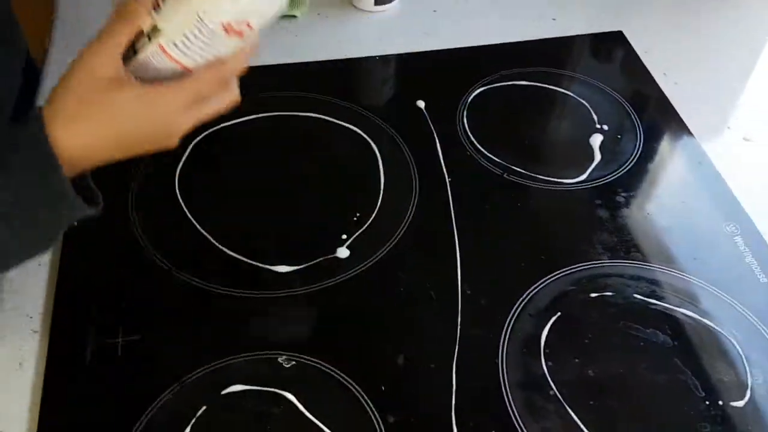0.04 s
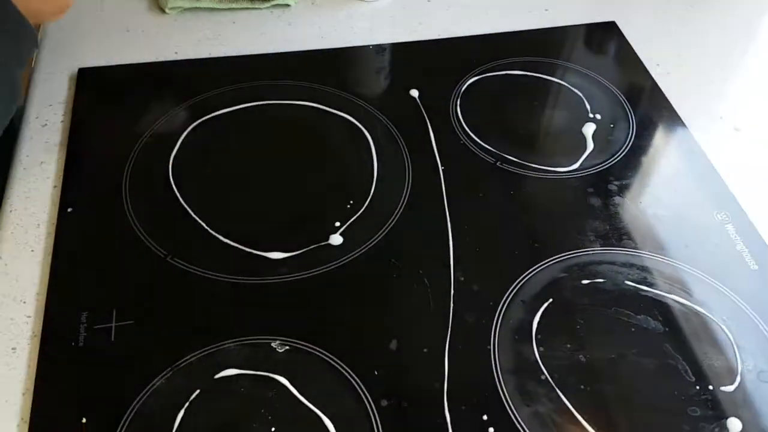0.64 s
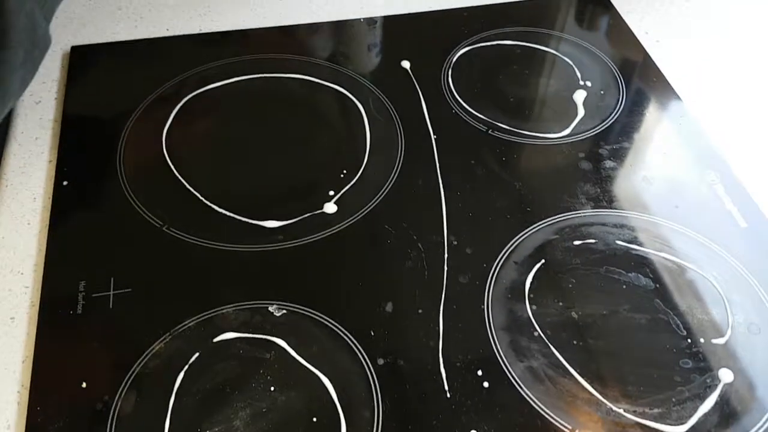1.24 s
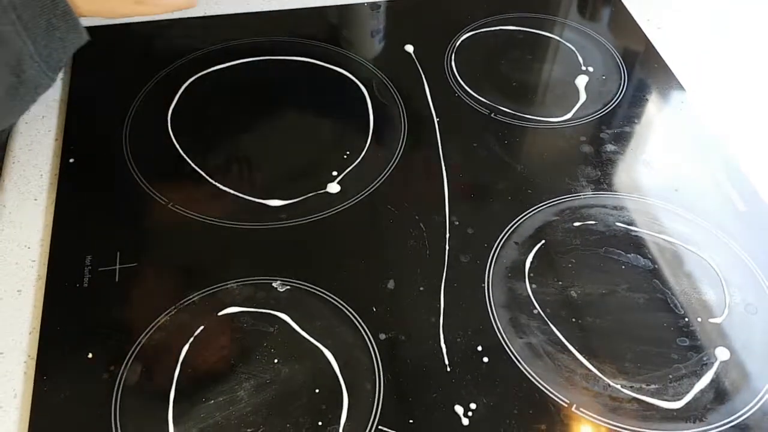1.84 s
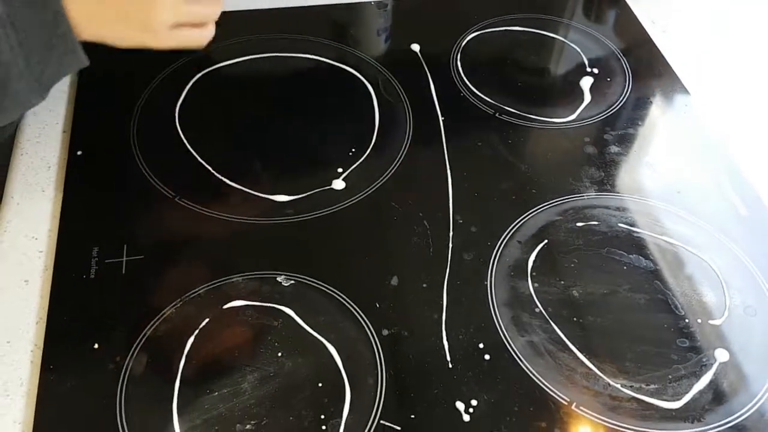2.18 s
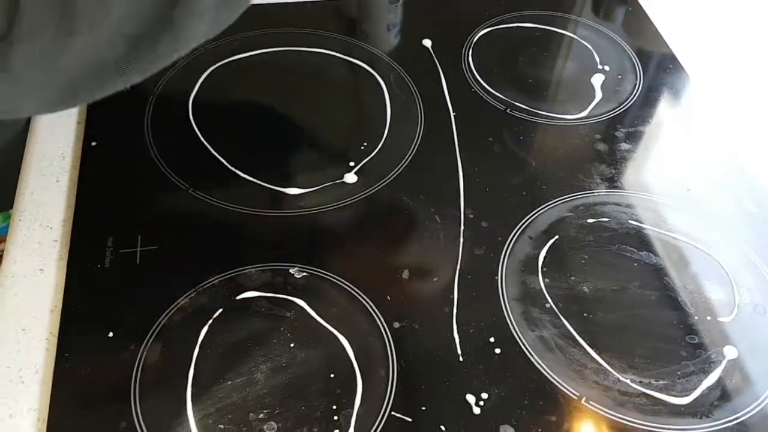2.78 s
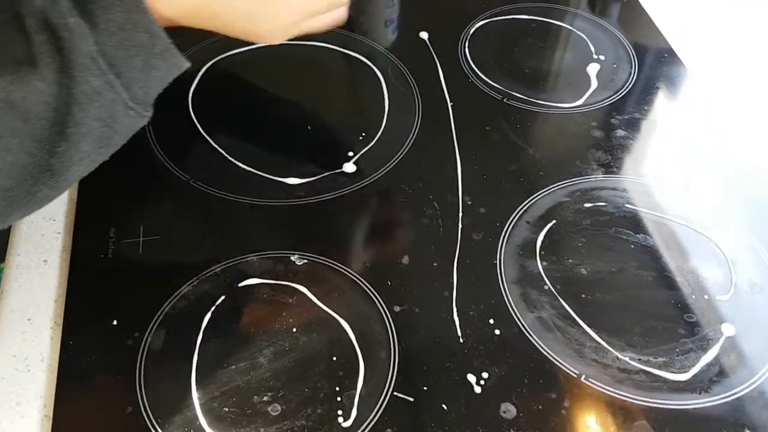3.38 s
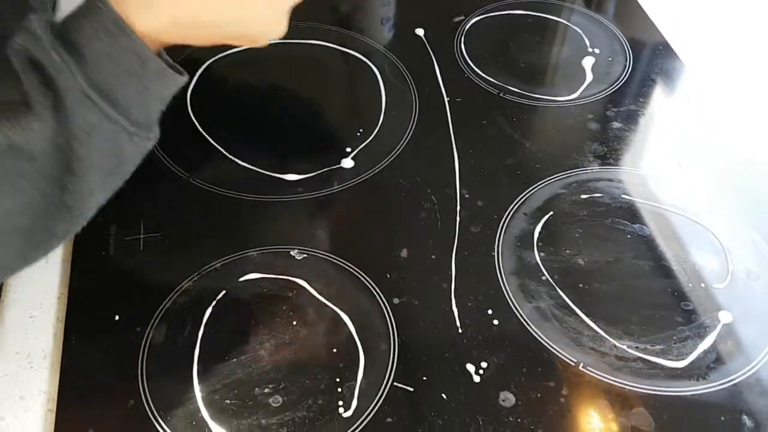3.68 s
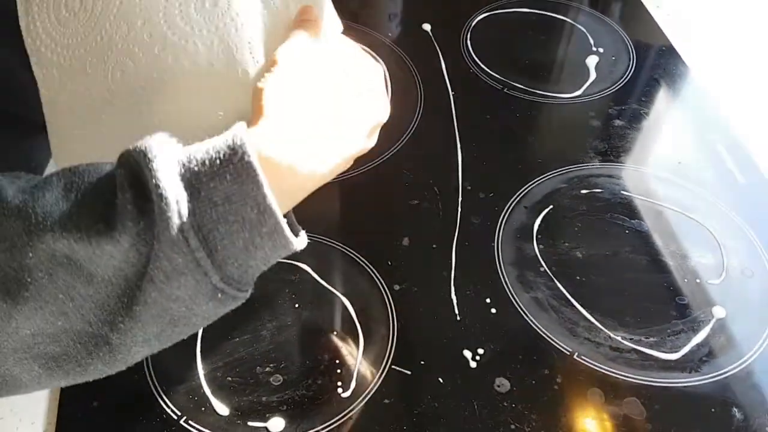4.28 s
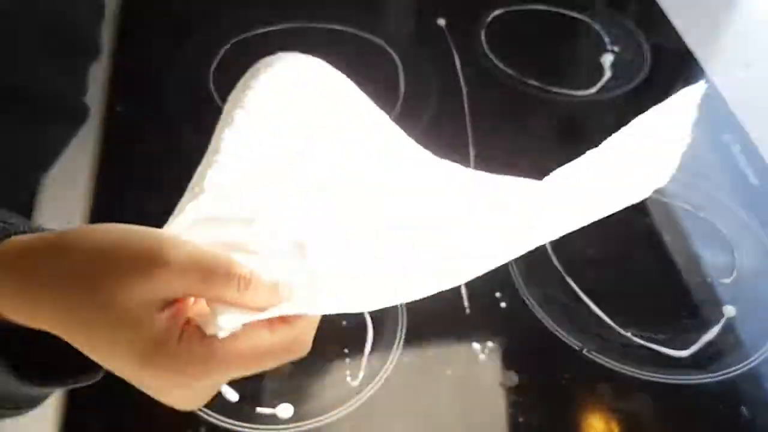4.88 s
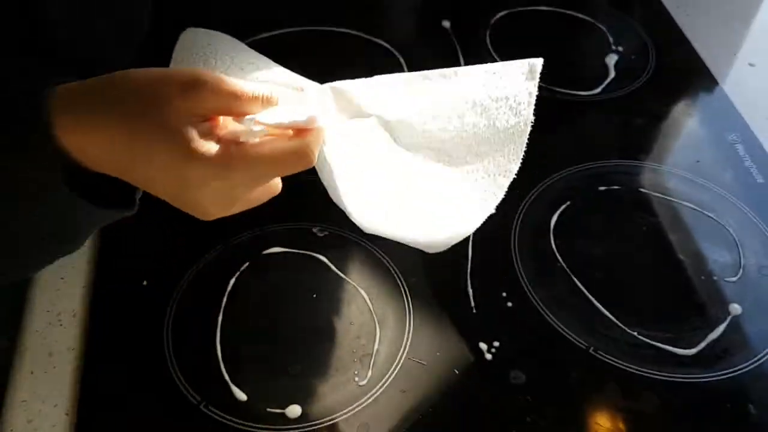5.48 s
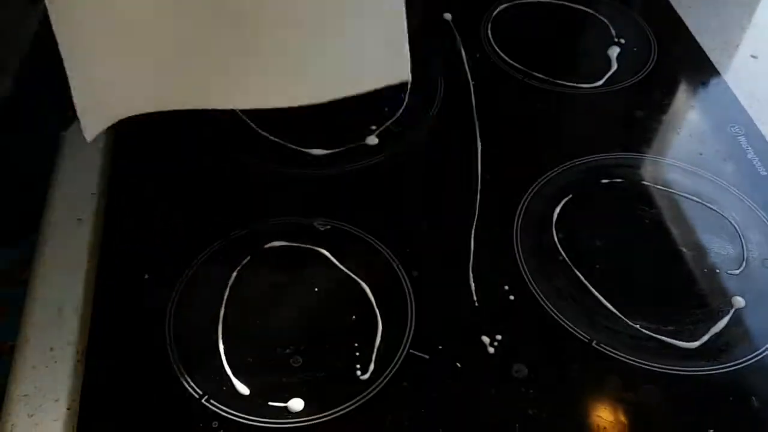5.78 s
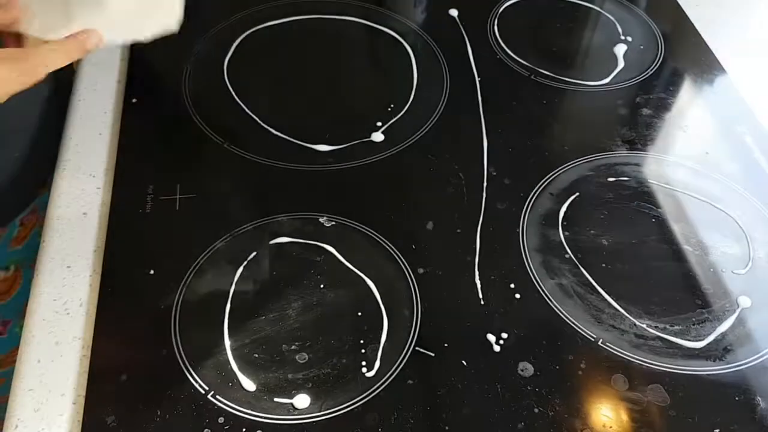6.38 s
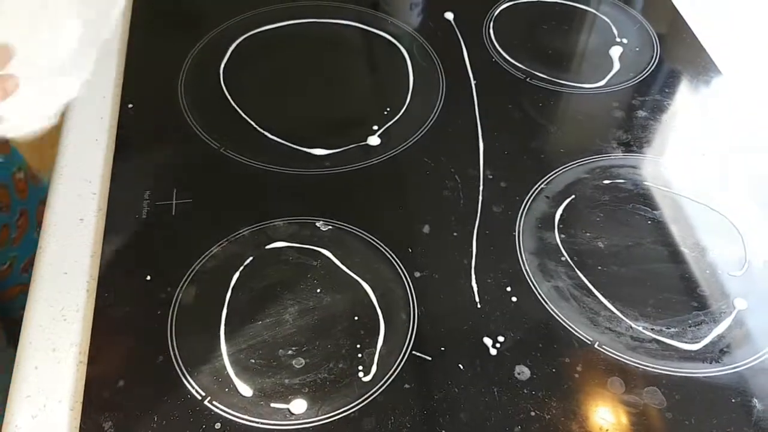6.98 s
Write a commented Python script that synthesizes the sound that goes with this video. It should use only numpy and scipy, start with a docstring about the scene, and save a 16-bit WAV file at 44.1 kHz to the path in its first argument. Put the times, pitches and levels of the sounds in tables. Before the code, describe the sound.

Over a faint appliance hum, a plastic cap clacks shut and a liquid-filled bottle lands on a kitchen counter, settling with a few light knocks and a short room echo. Cloth brushes near the microphone, with a cluster of dry static ticks on the left. One quick rip takes a paper towel off the roll, and quiet paper rustling, creases and soft bumps follow.

```python
"""In a kitchen, a plastic bottle of cleaner is snapped shut and set down beside a glass hob, where it
rocks and settles: the rim rings the shell, the liquid-filled base thuds. A sleeve rustles past the
microphone, static ticks in the left channel, and a paper towel is ripped off its roll in quick jerks
and handled, with soft bumps and flipping creases. An appliance motor hums faintly throughout."""
import sys
import numpy as np
from scipy import signal
from scipy.fft import rfft, irfft
from scipy.io import wavfile

SR = 44100
rng = np.random.default_rng(int(sys.argv[2]) if len(sys.argv) > 2 else 0)


def materialize(psi):
    """Save the field psi as 16-bit PCM at rate SR to the path in sys.argv[1].

    A 1-D psi becomes a single channel; in a 2-D psi each row is a channel.
    """
    bounded = np.clip(np.atleast_2d(psi).T, -1, 1)
    quanta = np.round(bounded * 32767).astype(np.int16)
    wavfile.write(sys.argv[1], SR, quanta)


N = 310464
TIME_S = np.arange(N) / SR


def from_db(db):
    """Decibels to gain."""
    return 10 ** (np.asarray(db) / 20)


def unit_rms(x):
    """Scale to unit power."""
    return x / np.sqrt(np.mean(x ** 2) + 1e-20)


def pan(left_db):
    """Channel gains for a left-right level difference."""
    return from_db(np.array([[left_db], [-left_db]]) / 2)


def at_hz(points, hz, column=1):
    """Read a table column on a log-frequency axis."""
    table = np.array(points)
    return np.interp(np.log(np.maximum(hz, 1)), np.log(table[:, 0]), table[:, column])


def drift(rate_hz):
    """Random wander: straight lines between unit-variance knots."""
    knots = rng.standard_normal(N // 40)
    return np.interp(TIME_S * rate_hz, np.arange(len(knots)), knots)


def decay(t, t60_s):
    """Exponential fall, 60 dB in t60_s."""
    return np.exp(-np.log(1000) * t / t60_s)


def add(out, start_s, sound):
    """Mix a sound in at start_s."""
    start = round(start_s * SR)
    part = sound[..., :N - start]
    out[..., start:start + part.shape[-1]] += part


# left-right likeness: (frequency [Hz], correlation [-1..1])
STEREO_CORRELATION = [(120, 0.85), (300, 0.67), (600, 0.63), (1000, 0.2), (1600, -0.23), (3500, -0.037),
                      (14000, 0.028)]


def noise(spectrum, size=N):
    """Coloured stereo noise of rms 1, alike in the bass, unrelated in the treble."""
    hz = np.fft.rfftfreq(size, 1 / SR)
    correlation = at_hz(STEREO_CORRELATION, hz)
    mid, side = rfft(rng.standard_normal((2, size)))
    stereo = np.sqrt(1 + correlation) * mid + np.sqrt(1 - correlation) * side * [[1], [-1]]
    return unit_rms(irfft(stereo * from_db(at_hz(spectrum, hz)), size))


def burst(spectrum, t60_s):
    """Decaying coloured noise, 0.2 s long."""
    t = TIME_S[:SR // 5]
    return noise(spectrum, size=len(t)) * decay(t, t60_s)


def ring(modes, contact_s, left_lag_s=0, scatter_db=4.5):
    """One blow on (frequency [Hz], level [dB], t60 [s]) modes; longer contact, softer onset."""
    t = TIME_S[:SR // 3]
    stereo_t = t + left_lag_s * np.array([[-0.5], [0.5]])
    out = np.zeros((2, len(t)))
    for hz, db, t60_s in modes:
        gain = from_db(db + scatter_db * rng.standard_normal())
        out += gain * decay(t, t60_s) * np.sin(2 * np.pi * hz * stereo_t)
    return out * (1 - np.exp(-t / contact_s))


# room noise: (frequency [Hz], relative density [dB])
ROOM_SPECTRUM = [(20, -2.5), (45, -2.5), (100, 0.5), (160, -9), (310, -5), (450, -11), (620, -14),
                 (1100, -27), (1700, -14.5), (3300, -25), (9000, -34.5), (14000, -28.5), (16000, -30.5)]


def appliance(hum_hz=400, waver_hz=2.25, air_width_hz=45, hum_db=-69, air_db=-86, room_db=-64.5):
    """A wavering motor tone in a narrow rush of air, over quiet room noise."""
    phase = 2 * np.pi * np.cumsum(hum_hz + waver_hz * drift(4.1)) / SR
    hum = unit_rms(np.sin(phase))
    air = unit_rms(drift(air_width_hz) * np.sin(phase) + drift(air_width_hz) * np.cos(phase))
    return from_db(hum_db) * hum + from_db(air_db) * air + from_db(room_db) * noise(ROOM_SPECTRUM)


# restless sleeve, louder nearer the microphone: (time [s], level [dB])
SLEEVE_LEVELS = [(0, -75.5), (2.1, -72.5), (2.65, -68), (3.1, -61), (3.75, -55), (4.4, -59.5),
                 (4.85, -66.5), (5.55, -74), (6.25, -66.5), (7.04, -69.5)]
# cloth or paper strokes: (start [s], length [s], swish [dB], fibre hiss [dB])
SLIDE_STROKES = [(0.274, 0.12, -82, -69.5), (0.587, 0.11, -82, -67.5), (0.949, 0.095, -66, -61.5),
                 (1.554, 0.054, -68.5, -63), (2.217, 0.12, -54, -56.5), (2.418, 0.1, -65, -68.5),
                 (2.749, 0.08, -52, -52), (2.79, 0.23, -60, -55), (3.107, 0.24, -59, -55.5),
                 (3.232, 0.18, -62.5, -52.5), (3.361, 0.23, -58.5, -58.5), (3.556, 0.33, -70, -56),
                 (3.71, 0.23, -59, -53.5), (4, 0.25, -75, -56.5), (4.23, 0.13, -45.5, -71),
                 (4.69, 0.15, -57.5, -81), (4.923, 0.083, -63.5, -62), (5.174, 0.095, -47.5, -52.5),
                 (5.243, 0.11, -59, -60.5), (5.344, 0.13, -64.5, -64), (5.573, 0.16, -69, -64.5),
                 (5.961, 0.31, -65.5, -59), (6.367, .14, -63, -59), (6.734, 0.3, -64.5, -58.5),
                 (6.929, 0.26, -65, -58.5)]


def sliding_gains(sleeve_hiss_db=-2, rise_share=0.24, fall_share=0.64):
    """Swish and hiss gains: strokes speed up, hold and ease off, adding power to the sleeve's stir."""
    sleeve = from_db(np.interp(TIME_S, *np.transpose(SLEEVE_LEVELS)))
    swish_power = sleeve ** 2
    hiss_power = (sleeve * from_db(sleeve_hiss_db)) ** 2
    for start_s, length_s, swish_db, hiss_db in SLIDE_STROKES:
        progress = (TIME_S - start_s) / length_s
        speed = np.clip(np.minimum(progress / rise_share, (1 - progress) / fall_share), 0, 1)
        swish_power += (from_db(swish_db) * speed) ** 2
        hiss_power += (from_db(hiss_db) * speed) ** 2
    return np.sqrt(swish_power), np.sqrt(hiss_power)


def shifting_folds(x, depth_db=3.5, rate_hz=34):
    """Shifting folds favour one band, then another."""
    hz, spectrum = np.fft.rfftfreq(N, 1 / SR), rfft(x)
    edges_hz = [0, *np.geomspace(500, 2500, 5), SR]
    out = np.zeros((2, N))
    for low, high in zip(edges_hz, edges_hz[1:]):
        band = irfft(spectrum * (hz >= low) * (hz < high), N)
        out += band * from_db(depth_db * drift(rate_hz))
    return out


# sliding cloth or paper, and its fibres: (frequency [Hz], relative density [dB])
SWISH_SPECTRUM = [(30, -14), (80, -1.5), (170, -6), (350, -10), (700, 0.5), (1200, 2.5), (1800, -3.5),
                  (2700, -6.5), (4000, -15), (8000, -26)]
HISS_SPECTRUM = [(1500, 2), (3500, 0), (6500, 0), (8000, -2), (9600, -9), (12000, 0), (14500, 2),
                 (16000, -6)]


def rustle():
    """Cloth and paper slide with a swish and a hiss; catching fibres make both grainy."""
    swish_gain, hiss_gain = sliding_gains()
    grain_db = drift(70) + drift(900)
    swish = swish_gain * from_db(1.3 * grain_db) * shifting_folds(noise(SWISH_SPECTRUM))
    hiss = hiss_gain * from_db(grain_db) * noise(HISS_SPECTRUM)
    return swish * pan(0.51) + hiss * pan(4.9)


# flip cap eased over, then snapped shut: (time [s], relative body level [dB], latch [dB], crack [dB])
CAP_CLICKS = [(0.504, -62, -67, -57), (0.507, -75, -45, -48.5), (.514, -51, -47, -54),
              (.7865, -34.5, -60, -35.5), (0.7898, -29, -45.5, -47), (0.7959, -36, -58, -41)]
# cap with the air under it, and its thin latch: (frequency [Hz], level [dB], t60 [s])
CAP_MODES = [(432, -20, 0.023), (780, 0, 0.02), (884, 2.5, 0.031), (1090, -5, 0.019), (1358, -1.5, 0.043),
             (1614, -3.5, 0.02), (2074, -3, 0.022)]
LATCH_MODES = [(3904, -9, .006), (4905, 2.5, 0.0095), (5430, 0, .014), (5860, -1, 0.0076)]
# dense damped lid modes, and the crack of plastic: (frequency [Hz], relative density [dB])
LID_SPECTRUM = [(60, -44), (380, -14.5), (600, -8.5), (800, 2), (1200, -4), (1650, -8), (2100, -8),
                (2700, -14), (6000, -39)]
CRACK_SPECTRUM = [(50, -31), (300, -34), (900, 6), (2000, 6.5), (3100, -8), (4800, 1.5), (6000, -9.5),
                  (7700, -3), (9800, -15.5), (13000, -4.5), (16000, -7.5)]


def cap_snap(cap_db=-4.5, lid_db=-5):
    """The lid clicks over its latch and seats with a hollow clack."""
    out = np.zeros((2, N))
    for time_s, body_db, latch_db, crack_db in CAP_CLICKS:
        cap = from_db(body_db + cap_db) * ring(CAP_MODES, contact_s=0.00069, left_lag_s=-0.00018)
        lid = from_db(body_db + lid_db) * burst(LID_SPECTRUM, t60_s=0.035)
        latch = from_db(latch_db) * ring(LATCH_MODES, contact_s=0.00037, left_lag_s=0.00004)
        crack = from_db(crack_db) * burst(CRACK_SPECTRUM, t60_s=0.034)
        for part in (cap, lid, latch * pan(2.8), crack * pan(2.6)):
            add(out, time_s, part)
    return out


# bottle meets worktop: (time [s], base thud [dB], shell ring [dB], rim crack [dB])
BOTTLE_KNOCKS = [(1.333, -85, -82, -62), (1.356, -9, -24, -27), (1.645, -70, -70, -53),
                 (1.652, -64, -81, -45), (1.6596, -37.5, -79, -53), (1.8004, -30, -57, -44.5),
                 (1.870, -33, -47.5, -60), (1.901, -49, -76, -52.5), (2.153, -55.5, -74.5, -59)]
# shell, and liquid-filled base on the worktop: (frequency [Hz], level [dB], t60 [s])
SHELL_MODES = [(570, -3, 0.063), (696, 1, 0.12), (720, -10, 0.17), (1012, -10.5, 0.028), (1143, -2, .06),
               (1211, 2.5, 0.051), (1362, -2, .06), (1688, -5, 0.045), (2403, -14, .08), (2477, -6, 0.028),
               (4030, -17, 0.13), (4450, -30, .06), (4920, -23, .07)]
BASE_MODES = [(69.4, -17.5, 0.12), (107, -16, 0.14), (180, 2.5, 0.12), (204, -6.5, 0.19),
              (291.5, -3.5, 0.1), (355, 4, 0.045), (377.5, 1.5, 0.071), (455, -15.5, .11)]
# dense damped wall modes: (frequency [Hz], relative density [dB])
WALL_SPECTRUM = [(35, -25), (150, -7), (400, 13.5), (750, 4.5), (1250, -3.5), (1900, -17.5), (2430, -4.5),
                 (3100, -23.5), (4300, -13.5), (6500, -34)]


def bottle_knocks(base_delay_s=0.00612, wall_db=2.5):
    """The rim touches first, ringing shell and wall; the heavy base lands a moment later."""
    out = np.zeros((2, N))
    for time_s, base_db, shell_db, crack_db in BOTTLE_KNOCKS:
        crack = from_db(crack_db) * burst(CRACK_SPECTRUM, t60_s=0.066)
        shell = from_db(shell_db) * ring(SHELL_MODES, contact_s=0.0022, left_lag_s=1e-4, scatter_db=2.5)
        wall = from_db(shell_db + wall_db) * burst(WALL_SPECTRUM, t60_s=0.22)
        base = from_db(base_db) * ring(BASE_MODES, contact_s=0.0043, left_lag_s=1.9e-4, scatter_db=1.5)
        for part in (crack * pan(2.7), shell, wall * pan(0.73)):
            add(out, time_s, part)
        add(out, time_s + base_delay_s, base * pan(-1.2))
    return out


# soft low thumps, the first from the rocking bottle, the rest from hand and paper:
# (time [s], thump [dB], thump pitch [Hz], relative puff level [dB])
SOFT_BUMPS = [(1.901, -38, 305, -54), (2.762, -40, 125, -51), (3.368, -48.5, 192, -53),
              (3.998, -40, 102, -43.5), (4.026, -41, 90, -44.5), (4.053, -43, 109, -50),
              (4.903, -54, 346, -50.5), (5.274, -34.5, 120, -43.5), (5.443, -43.5, 248, -55),
              (5.88, -69, 387, -51), (5.967, -51, 346, -51.5), (5.996, -40, 323, -45),
              (6.119, -68, 310, -49.5)]
# dull puff: (frequency [Hz], relative density [dB])
PUFF_SPECTRUM = [(25, -16), (80, 4), (250, 11.5), (700, 5), (1200, -1), (2200, -9.5), (5000, -15),
                 (16000, -30)]


def soft_bumps(puff_rise_s=0.0017, puff_boost_db=2):
    """Soft contacts: a damped thump and a dull puff that starts gently."""
    out = np.zeros((2, N))
    for time_s, thump_db, thump_hz, puff_db in SOFT_BUMPS:
        puff = burst(PUFF_SPECTRUM, t60_s=0.083)
        puff *= 1 - np.exp(-TIME_S[:puff.shape[1]] / puff_rise_s)
        thump = ring([(thump_hz, thump_db, 0.07)], contact_s=0.00074, scatter_db=0.5)
        add(out, time_s, thump)
        add(out, time_s, from_db(puff_db + puff_boost_db) * puff)
    return out


# paper creases flipping over: (time [s], level [dB])
CREASE_FLIPS = [(2.19, -50), (4.432, -42.5), (4.902, -52), (5.281, -37.5), (6.312, -53), (6.638, -43)]


def crease_ticks():
    """Each flipping crease is a short tick with the colour of sliding paper."""
    out = np.zeros((2, N))
    for time_s, db in CREASE_FLIPS:
        add(out, time_s, from_db(db) * burst(SWISH_SPECTRUM, t60_s=0.013))
    return out


# static discharges: (time [s], peak [dB])
DISCHARGES = [(3.6661, -10), (3.6887, -18.6), (3.7099, -19.5), (3.7274, -21.5), (3.7657, -19),
              (3.9279, -16), (3.974, -17), (3.9772, -25.4), (4.0032, -19.5), (4.006, -24), (4.0226, -18.5),
              (4.0267, -22.5), (4.0413, -24), (4.0515, -7.5), (4.0804, -30.5)]


def static_ticks(low_cut_hz=780, full_scale_cutoff_hz=2400, dulling_per_db=0.009, right_leak_db=-36):
    """Each discharge is one short dry swing in the left channel, wider and duller the weaker it is."""
    highpass = signal.butter(2, low_cut_hz, "high", fs=SR, output="sos")
    kick = signal.sosfilt(highpass, signal.unit_impulse(SR // 50))
    out = np.zeros(N)
    for time_s, peak_db in DISCHARGES:
        cutoff_hz = full_scale_cutoff_hz * np.exp(dulling_per_db * peak_db)
        swing = signal.sosfilt(signal.butter(6, cutoff_hz, fs=SR, output="sos"), kick)
        add(out, time_s, -from_db(peak_db) * swing / np.abs(swing).max())
    return out * from_db([[0], [right_leak_db]])


# perforation giving way: (time [s], roll [dB], tearing fibres [dB])
RIP_JERKS = [(4.465, -42, -23), (4.472, -27.5, -21.5), (4.4775, -27, -26.5), (4.485, -22.5, -27),
             (4.4923, -34, -28.5)]
# paper roll and holder: (frequency [Hz], level [dB], t60 [s])
ROLL_MODES = [(121, -11, 0.072), (189, 1, 0.038), (301.8, -15, 0.19), (410.5, -21.5, 0.23),
              (555, -5, 0.035), (642, -5, .045), (784, 7, 0.018), (892, 5.5, 0.038), (1388, -2, 0.06),
              (1710, -3.5, 0.068)]
# tearing fibres: (frequency [Hz], relative density [dB])
TEAR_SPECTRUM = [(25, -23), (120, -15), (500, 3.5), (1800, -4), (3000, -8), (7500, -15), (9700, -20.5),
                 (12500, -11.5), (16000, -16.5)]


def towel_rip(push_hz=650, push_db=9):
    """Each jerk snaps a run of fibres, gives one sharp push of air and sets the roll ringing."""
    out = np.zeros((2, N))
    for time_s, roll_db, fibres_db in RIP_JERKS:
        roll = ring(ROLL_MODES, contact_s=0.0015, left_lag_s=-0.00024, scatter_db=3)
        push = ring([(push_hz, push_db, 0.01)], contact_s=0.00041, left_lag_s=-0.00015)
        snap = burst(TEAR_SPECTRUM, t60_s=0.016)
        tail = from_db(-3) * burst(TEAR_SPECTRUM, t60_s=0.088)
        add(out, time_s, from_db(roll_db) * (roll * pan(0.91) + push * pan(1.5)))
        add(out, time_s, from_db(fibres_db) * (snap + tail) * pan(3.5))
    return out


# kitchen echo: (frequency [Hz], t60 [s], relative level [dB])
ECHO_BANDS = [(90, 0.63, -7.5), (177, 0.4, -10), (353, 0.6, -7), (805, 0.45, -6), (2020, 0.49, -1.5),
              (4500, 0.48, -7.5), (8000, 0.42, -7), (15000, 0.3, -15)]


def kitchen_echo(x, build_s=0.0017, build_cycles=1.8):
    """Diffuse echo in half-octave bands; the bass builds slowest, the treble dies first."""
    t, hz = TIME_S[:SR], np.fft.rfftfreq(SR, 1 / SR)
    white = rfft(noise([(1, 0), (SR, 0)], size=SR))
    edges_hz = np.geomspace(45, 17000, 18)
    response = np.zeros((2, SR))
    for low, high in zip(edges_hz, edges_hz[1:]):
        centre_hz = np.sqrt(low * high)
        swell = 1 - np.exp(-t / (build_s + build_cycles / centre_hz))
        fade = decay(t, at_hz(ECHO_BANDS, centre_hz))
        band = irfft(white * (hz >= low) * (hz < high), SR) * swell * fade
        unity_gain_band = unit_rms(band) * np.sqrt(2 * (high - low)) / SR
        response += unity_gain_band * from_db(at_hz(ECHO_BANDS, centre_hz, column=2))
    return signal.fftconvolve(x.mean(axis=0, keepdims=True), response, axes=1)[:, :N]


def scene():
    """Handling sounds with their kitchen echo, plus dry rustle, static and hum."""
    knocks, snaps, rip = bottle_knocks(), cap_snap(), towel_rip()
    soft = soft_bumps() + crease_ticks()
    echo = kitchen_echo(knocks + from_db(-0.5) * snaps + from_db(-4) * rip + soft)
    return knocks + snaps + rip + soft + echo + rustle() + static_ticks() + appliance()


def record(dry, low_cut_hz=42, high_cut_hz=16200):
    """The small microphone loses the deep bass; the top is cut steeply."""
    highpass = signal.butter(2, low_cut_hz, "high", fs=SR, output="sos")
    lowpass = signal.ellip(10, 0.2, 80, high_cut_hz, fs=SR, output="sos")
    return signal.sosfilt(lowpass, signal.sosfilt(highpass, dry))


dry = scene()
out = record(dry)
materialize(out)
```